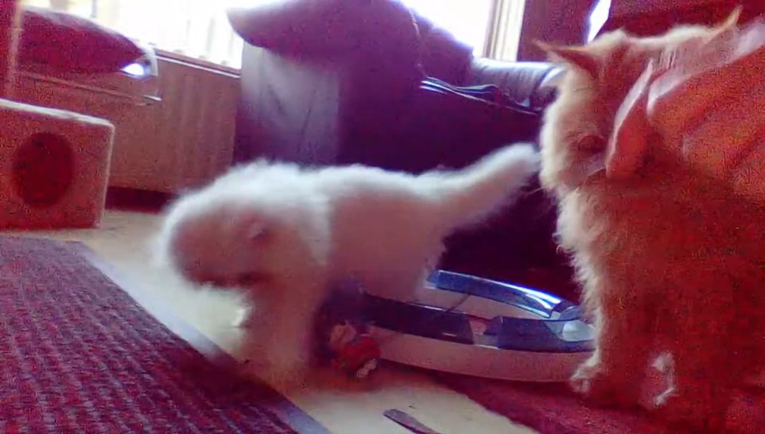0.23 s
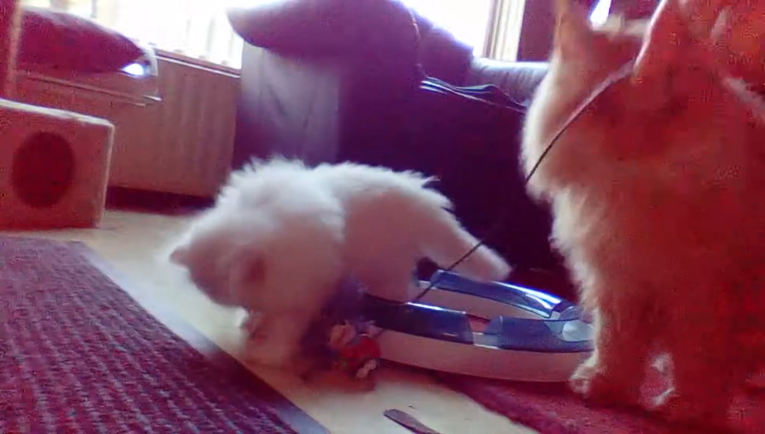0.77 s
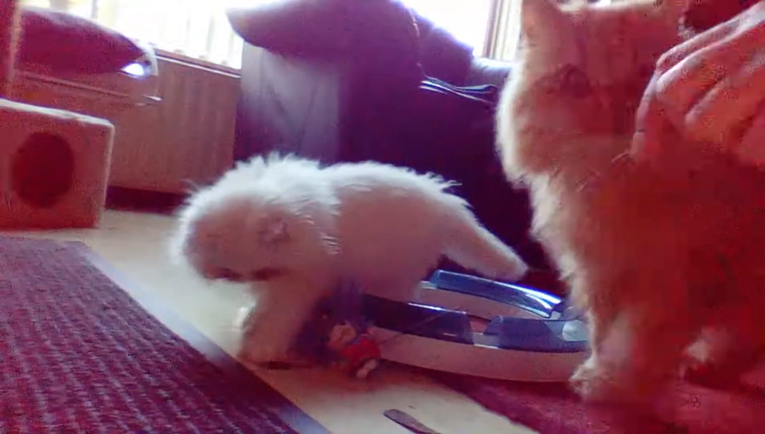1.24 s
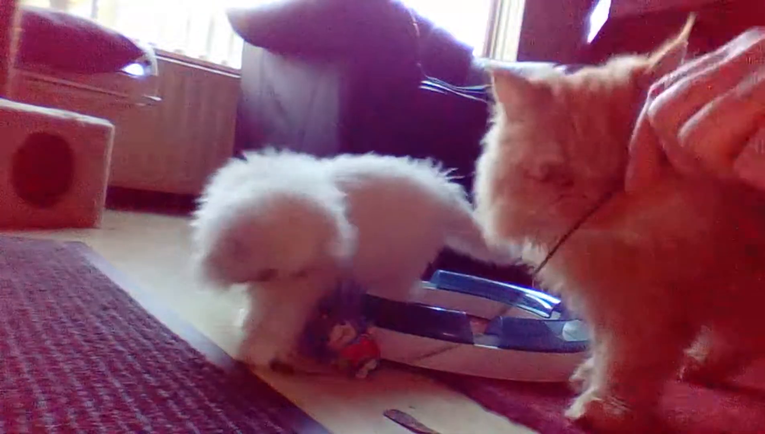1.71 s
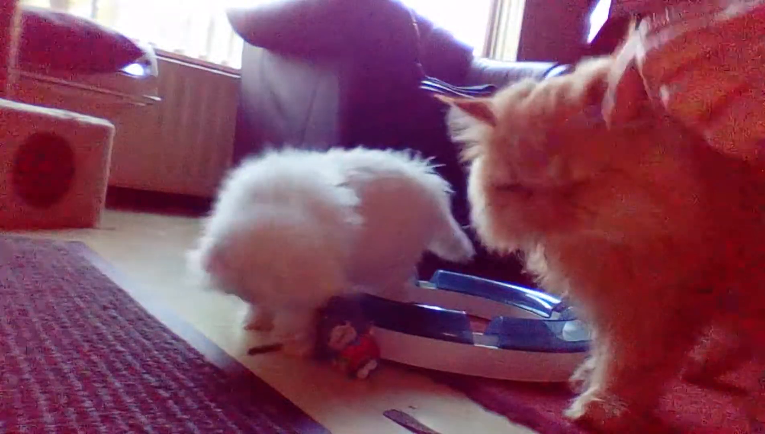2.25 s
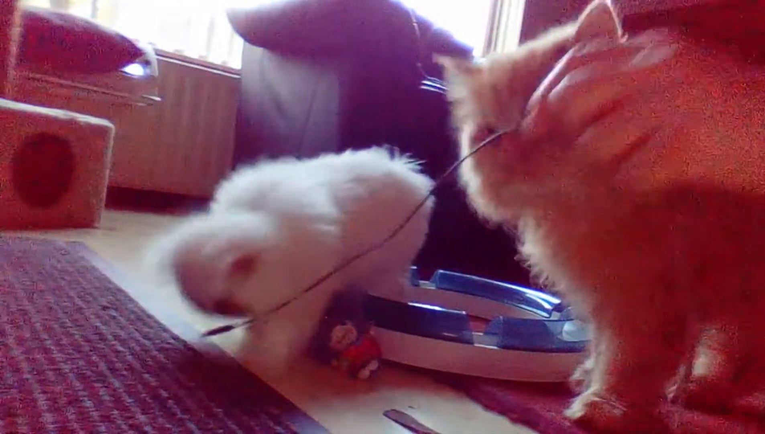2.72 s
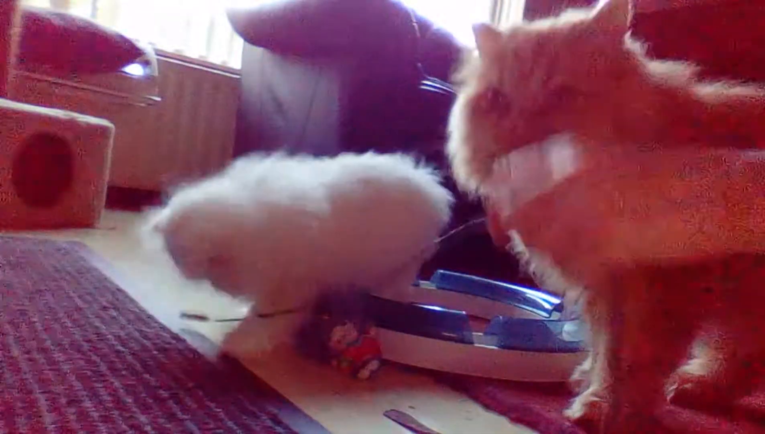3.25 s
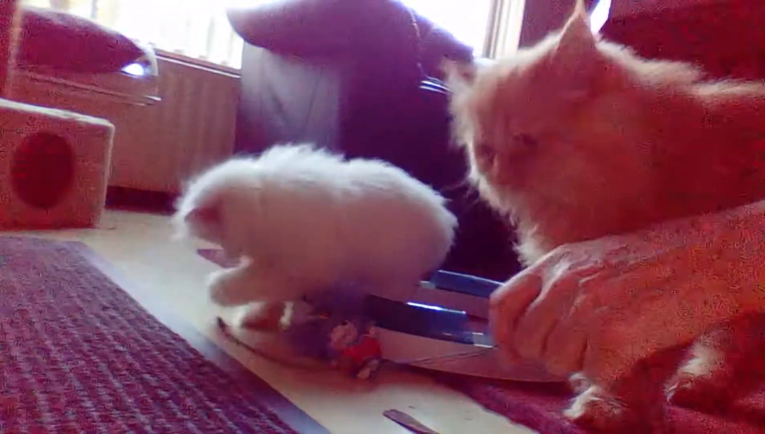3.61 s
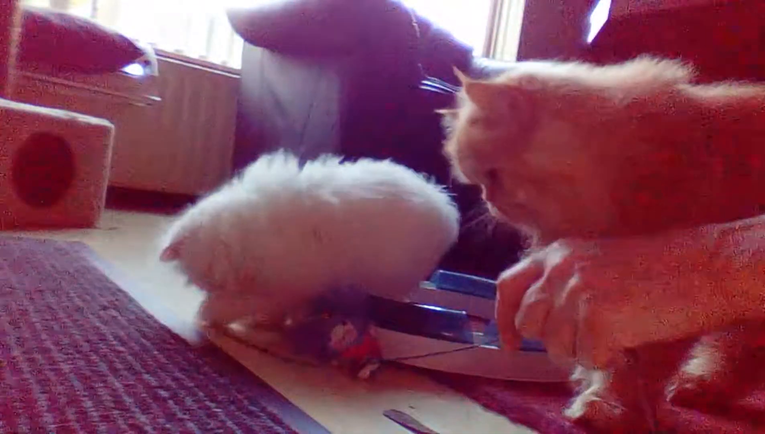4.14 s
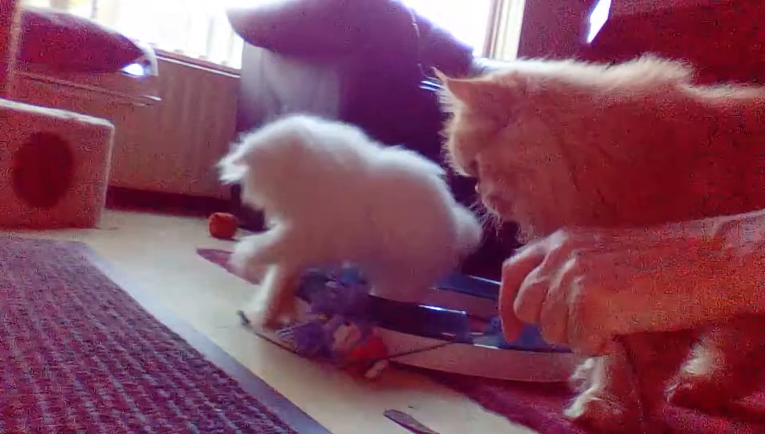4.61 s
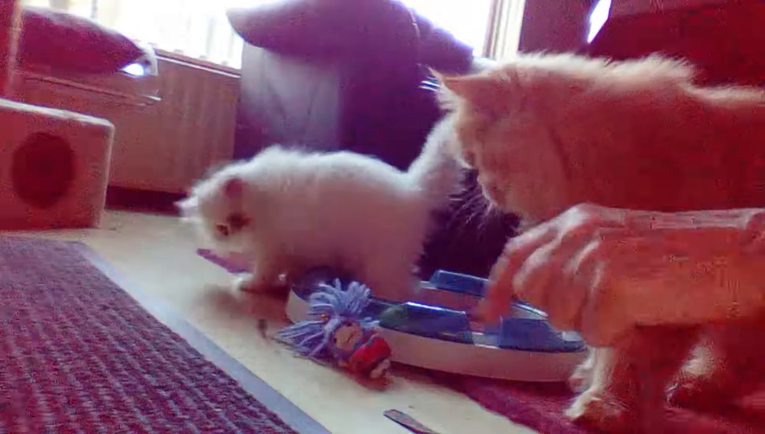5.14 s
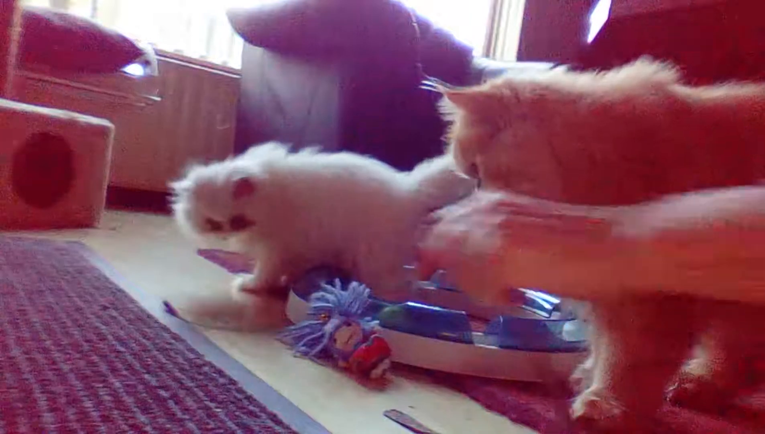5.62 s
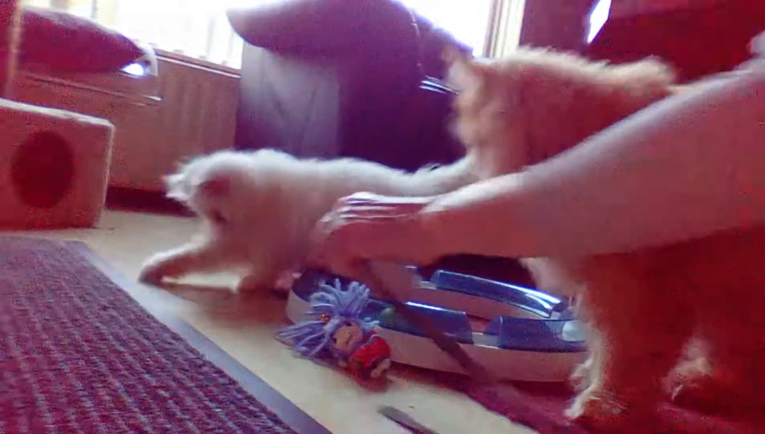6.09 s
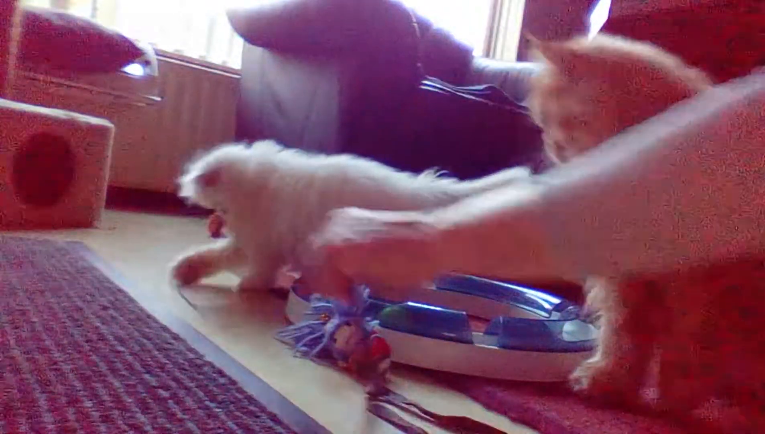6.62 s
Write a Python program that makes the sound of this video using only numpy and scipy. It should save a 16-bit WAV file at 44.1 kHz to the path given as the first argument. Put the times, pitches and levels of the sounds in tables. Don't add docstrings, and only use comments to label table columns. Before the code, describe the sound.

Hard plastic knocks and scrabbling scratches come in fits and starts as kittens play close by on the floor, a faint electrical hum beneath.

```python
import sys
import numpy as np
from scipy import signal
from scipy.io import wavfile
from scipy.ndimage import uniform_filter1d

SR = 44100
rng = np.random.default_rng(int(sys.argv[2]) if len(sys.argv) > 2 else 0)


def put_to_file(sound):
    columns = np.atleast_2d(sound).T
    safe = np.clip(columns, -1, 1)
    whole_steps = np.round(safe * 32767)
    wavfile.write(sys.argv[1], SR, whole_steps.astype(np.int16))


def level_to_linear(level):
    exponent = np.asarray(level, float) / 20
    return 10 ** exponent


N = 302526

# [t/s, peak level/dB, hollow body/dB, brightness/dB, chatter fall/dB per ms]
KNOCKS = [(0.0393, -2, -34, 23, 3.5), (0.0418, -10.5, -17.5, 13, 1), (0.048, -20, -35, -2, 5),
          (0.147, -31, -29, 5, -1), (0.208, -34.5, -21.5, -13, -1), (0.232, -18.5, -24, 4, -4),
          (0.237, -12, -26, 15, 0.5), (0.337, -34, -27, -0.5, -3), (0.995, -16, -27.5, 6.5, 0.5),
          (1.887, -3, -36, 18, 2), (1.8886, -14.5, -24, 30, -10.5), (1.906, -27, -15.5, 22, 11),
          (1.977, -30, -35, -25, 0), (2.063, -21, -20.5, 0, 2), (2.484, -16, -21, -31, 0.7),
          (2.519, -19.5, -17, -36, 3.5), (3.5423, -25, -32, 4, 2.5), (3.5503, 0.5, -39, 11.5, 2.5),
          (3.5527, -5.5, -40, 11.5, 2), (3.6237, -16, -28, 5, -1.3), (3.627, -10.5, -29.5, 1.5, 1),
          (3.677, -12.5, -26, 3.5, 0.6), (3.934, -35, -41.5, -6, 6), (5.367, -21, -36, -20, 1)]
# [t/s, peak level/dB, brightness/dB, left minus right/dB]
CLAW_CATCHES = [(0.6116, -37, 5, 0), (0.6408, -36.5, 5, 7), (0.6524, -43, 9, 3.0), (0.6647, -34.5, 3, 7),
                (0.688, -39, 3, 5), (0.7213, -43, 3, 7), (0.7303, -45, 8, 6), (0.7382, -45, 3, 14),
                (0.7552, -51, 5, 1.0), (0.7623, -36, 8, 9), (0.771, -39, 2, 8), (0.8021, -39, 1, 1),
                (0.8395, -50, 5, 3), (0.8844, -47, -3, 5), (0.9027, -42, 5, -3), (0.9302, -39, 5, 2.5),
                (0.9332, -32, 11, 6), (0.9388, -30, 7, 2), (0.9541, -33, 12, 7), (0.966, -36, 8, 10),
                (0.9765, -28.5, 11, 0),
                (1.07, -55, 10, 1.0), (1.0924, -44.5, 10, 2.5), (1.111, -43, 15, 1.5),
                 (1.15, -59, 8.8, 0.5), (1.208, -57, 10, 3.5), (1.2461, -57, 10, 2.2),
                 (1.2647, -56, 10, 1.2), (1.2912, -39, 8, 0.5), (1.3139, -39, 8.9, 0.5),
                 (1.3291, -32, 8.7, 6.6), (1.333, -28, 10, 6.7), (1.3464, -27.5, 11, 6),
                 (1.351, -34, 6.9, 2.5), (1.3642, -29, 8.2, 5.7), (1.4454, -32, 4.4, 4.0),
                 (1.472, -36, 6.5, 2.8), (1.51, -41, 8.7, 5.1), (1.5457, -32, 8, 3.0),
                 (1.5595, -33, 8.5, 2.5), (1.5776, -29.5, 7.5, 2.5), (1.5892, -29, 9.2, 3.0),
                 (1.6528, -30.5, 4.6, 6)]
# [t/s, peak level/dB, brightness/dB, left minus right/dB]
STRING_TICKS = [(2.196, -40, 7, 7), (2.205, -33.5, 15, 11), (2.214, -34.5, 2.5, 9), (3.979, -36, -4, 3),
                (4.088, -35.5, 1, 8), (4.138, -43, -3, -1), (4.359, -43.5, -5.5, 1), (4.518, -45, -16, 5.5),
                (4.836, -53, 3.5, 4), (4.858, -41, 3, 1.5), (4.889, -31, -2, 9), (4.904, -28, -3, 8),
                (4.948, -27, 1, -9), (4.968, -21.5, -1, 1), (5.136, -27.5, 4, -10), (5.155, -32, -3, -1),
                (5.188, -31, -14, -2), (5.236, -39, 2, 5), (5.256, -37, -6, 5), (5.301, -36, 4, -9),
                (5.331, -36, 12, -5), (5.341, -31, 2, 3), (6.117, -40, 6, -6), (6.608, -43, 3, -2),
                (6.711, -35, -6, -11), (6.832, -30, -3, -6)]
# [touch t/s, hardest t/s, lift t/s, level/dB, brightness/dB]
STROKES = [(-.02, 0.0, 0.01, -46, 6), (0.388, .425, 0.41, -60.5, -11), (0.607, 0.652, 0.66, -49.5, -2.5),
           (0.73, 0.758, 0.75, -50, -4), (0.804, 0.856, 0.9, -59, -30), (0.893, 0.976, 0.97, -46, -8.5),
           (1.054, 1.098, 1.127, -53.5, -27), (1.238, 1.31, 1.6, -56.5, -7), (1.321, 1.375, 1.43, -46, 1.5),
           (1.439, 1.455, 1.456, -47, -20), (1.507, 1.505, 1.6, -56.5, -22),
           (1.549, 1.57, 1.622, -45.5, -3), (2.191, 2.21, 2.22, -51.5, -16),
           (3.93, 3.936, 3.91, -48, -10.5), (3.976, 3.992, 4.024, -51, -20), (4.083, 4.082, 4.14, -60, -12),
           (4.842, 4.91, 4.93, -49, -13), (4.937, 4.98, 4.975, -43.5, 0), (5.136, 5.142, 5.21, -51.5, -5),
           (5.221, 5.248, 5.26, -56.5, -3), (5.322, 5.348, 5.37, -51.5, -13),
           (6.604, 6.612, 6.67, -57.5, -5), (6.665, 6.72, 6.755, -51.5, -7),
           (6.772, 6.855, 6.82, -49.5, -6.5)]
# [t/s, level/dB, brightness/dB, hollow body/dB]
TAILS = [(0.052, -38.5, 25, -14), (0.148, -59, -7, -25), (0.245, -47, -2, -9.5), (0.339, -60, -11, -9),
         (1.001, -51, -17, -20), (1.899, -42.5, 1, -18), (1.986, -60.5, -17, 4), (2.03, -62.5, -14, 5.5),
         (2.07, -51, -14, -27), (2.491, -53, -15, 2), (2.527, -60, -24, 2), (3.543, -44, -1, -22),
         (3.563, -34, 13, -20), (3.638, -40.5, 9, -18), (3.691, -44, 5.5, -15)]
# [f/Hz, level/dB, time to fall 60 dB/s]
RIM = [(2450, -4, 0.018), (3150, -13.5, 0.045), (4227, 10, 0.036), (5400, -41, 0.0032), (5600, 4, 0.03)]
# [f/Hz, level/dB, time to fall 60 dB/s]
WALL = [(990, -24.5, 0.039), (1102, 6, 0.018), (1255, 1, 0.017), (1680, -12.5, 0.093)]
# [f/Hz, level/dB, time to fall 60 dB/s]
SHELL = [(310, 8, 0.0095), (406, 0, 0.046), (455, -3.5, 0.047), (518, -3, 0.045), (640, -8, 0.02)]
# [t/s, level/dB]
ROLL_NUDGES = [
    (2.937, -66.5),
    (3.061, -77),
    (3.089, -75),
    (3.154, -68),
    (3.25, -70),
]
# [middle t/s, length/s, level/dB, centre f/Hz]
FUR_BRUSHES = [
    (3.325, 0.077, -64, 6000),
    (5.601, .14, -60, 6700),
    (6.176, .1, -63, 6000),
    (6.312, 0.076, -66, 6400),
    (6.31, 0.13, -74.5, 1900),
]
# [t/s, peak level/dB, f/Hz, time to
# fall 60 dB/s]
THUMPS = [(0.052, -45, 87, 0.15), (0.088, -49, 80.7, 0.12), (0.299, -68, 95, 0.12),
          (2.491, -39, 400, 0.082), (2.497, -58.5, 93.6, 0.12), (2.519, -60, 92.97, 0.12),
          (3.555, -52, 69.5, 0.15), (3.629, -46, 96, 0.076), (3.688, -49, 83.4, 0.11),
          (4.918, -50, 97, 0.16), (6.219, -50, 90, 0.093)]
# [f/Hz, time to fall 60 dB/s]
ROOM_RING = [(300, 0.32), (800, 0.39), (2100, 0.14), (5500, 0.093)]
# [f/Hz, level/dB]
LEFT_PORT = [(200, -31.5), (800, -14.5), (2000, -11.5), (3900, -3.5), (5200, -3), (6000, -4.5),
             (6650, -3.5), (7200, -6), (7600, -9.5), (8100, -22), (10000, -60.5), (11500, -56),
             (16000, -101.5)]
# [f/Hz, level/dB]
RIGHT_PORT = [(200, -37), (800, -14.5), (2000, -14), (3900, -3), (4700, 0), (5800, -10), (7000, -17),
              (7900, -17.5), (9300, -19.5), (10300, -28), (11500, -50), (16000, -75)]
# [from t/s, delay/samples]
LEFT_LATE = [
    (0, 2),
    (2.4, 5),
    (3.4, 6),
    (3.9, 4),
]
# [f/Hz, level/dB per Hz]
HISS_COLOUR = [(20, -20), (45, -24), (70, -15.5), (120, 5), (200, -5), (300, -9.5), (600, -14.5),
               (1500, -21), (4000, -23), (6600, -22), (7600, -31), (8300, -37.5), (11000, -39.5),
               (15000, -41.5)]
# [f/Hz, likeness/0 to 1]
HISS_LIKENESS = [(60, 0.6), (240, 0.33), (470, 0.064), (940, 0.028)]
# [f/Hz, left minus right/dB]
HISS_BALANCE = [(60, -0.5), (160, 2.5), (410, -1.5), (1080, 0), (2830, 0.5), (7430, 3)]
# [multiple of mains f, left level/dB, right level/dB, phase/rad]
HUM_PARTS = [(1, -83, -83, -5), (2, -67, -65, -2.5), (3, -59, -56, 2), (4, -75.5, -83.5, -0.3),
             (6, -91.5, -89.5, -1.5)]


def taps():
    knock_pan_db = 1.5
    claw_gain_db, claw_body_db, claw_chatter_db, claw_pan_db = 8.5, -27.5, 5.5, 0.5
    tick_body_db, tick_chatter_db = -30, 1.5
    rows = [(*row, knock_pan_db) for row in KNOCKS]
    for s, db, bright_db, pan_db in CLAW_CATCHES:
        rows.append((s, db + claw_gain_db, claw_body_db, bright_db, claw_chatter_db, pan_db + claw_pan_db))
    for s, db, bright_db, pan_db in STRING_TICKS:
        rows.append((s, db, tick_body_db, bright_db, tick_chatter_db, pan_db))

    clicks = np.zeros((2, 3, N + 4096))
    chance = rng.random((len(rows), 2, 9))
    for (s, db, body_db, bright_db, chatter_db, pan_db), (gaps, sizes) in zip(rows, chance):
        after_ms = np.cumsum(np.r_[0, 0.35 + 1.1 * gaps[1:]])
        fall_db = np.clip(chatter_db, 0.5, 8) * after_ms
        size = level_to_linear(15 - fall_db) * np.r_[1, 1.7 * (sizes[1:] - 0.5)]
        at = np.round((s + (after_ms + 0.7) / 1000) * SR).astype(int)
        sides = level_to_linear(np.clip([pan_db, -pan_db], -8, 8) / 2)
        mix = np.outer(sides, hardness(db, bright_db, body_db + 5))
        clicks[:, :, at] += mix[:, :, None] * size
    sound = np.array([plastic(*side[:, :N]) for side in clicks])
    return level_to_linear(-1.5) * fizzed(sound, -4)


def strokes():
    slips_per_s, snaps_per_s = 7000, 320
    spread_db, clump_db, fibre_db, snap_db = 1.5, 2.5, 5, 17
    scrape, tail = pressure()
    clumps = slow_wander(rng.standard_normal(N), 200)
    size = level_to_linear(spread_db * np.minimum(rng.exponential(1, N), 4) + clump_db * clumps)
    slips = evened(size * rng.choice([-1, 1], N) * (rng.random(N) < slips_per_s / SR))

    fibre = rng.integers(0, 16, N)
    grains = np.zeros((2, N))
    t = np.arange(128) / SR
    for k, hz in enumerate(np.geomspace(1300, 9000, 16)):
        twang = np.cos(2 * np.pi * hz * t) * level_to_linear(-3.5 * hz * t)
        pluck = (t == 0) + level_to_linear(fibre_db) * twang / np.linalg.norm(twang)
        grain = signal.oaconvolve(slips * (fibre == k), pluck)[:N]
        grains += [grain, np.roll(grain, rng.integers(-4, 5))]

    snaps = level_to_linear(snap_db + 3.5 * rng.standard_normal(N)) * (rng.random(N) < snaps_per_s / SR)
    washes = 1.2 * rng.standard_normal(N) + 1.3 * rng.standard_normal((N, 2)).T
    rubbed = [plastic(*(scrape * (grain + snaps) + tail * wash)) for grain, wash in zip(grains, washes)]
    return level_to_linear(4) * fizzed(np.array(rubbed), -0.5)


def pressure():
    touch_db, lift_db, body_db = -9.5, -4.5, -15.5
    land_db_per_s, release_db_per_s, tail_fall_db_per_s = 2500, 267, 253.5
    t = np.arange(0, N + 32, 32) / SR
    scrape, tail = 0, 0
    for touch, hardest, lift, db, bright_db in STROKES:
        times = [touch, max(hardest, touch), max(lift, hardest)]
        shape_db = np.interp(t, times, [touch_db, 0, lift_db])
        shape_db -= release_db_per_s * np.maximum(t - lift, 0)
        shape_db -= land_db_per_s * np.maximum(touch - t, 0)
        stroke_body_db = body_db + (db + 51)
        scrape = scrape + hardness(db + shape_db, bright_db, stroke_body_db) ** 2
    for s, db, bright_db, tail_body_db in TAILS:
        level_db = np.where(t < s, -160, db - tail_fall_db_per_s * (t - s))
        tail = tail + hardness(level_db, bright_db, tail_body_db) ** 2
    return np.repeat(np.sqrt([scrape, tail]), 32, axis=2)[:, :, :N]


def hardness(db, bright_db, body_db):
    bright_db = np.clip(bright_db, -25, 18)
    sharp_db = db + np.minimum(bright_db, 0)
    dull_db = db - np.maximum(bright_db, 0)
    return level_to_linear(np.array([sharp_db, dull_db, db + body_db]))


def plastic(sharp, dull, hollow):
    thin = signal.lfilter(*signal.butter(1, 1970, "high", fs=SR), sharp)
    soft = signal.lfilter(*signal.butter(1, 2320, fs=SR), dull)
    rim, wall, shell = level_to_linear(-24) * ring(sharp, RIM), level_to_linear(-14) * ring(dull, WALL), level_to_linear(12) * ring(hollow, SHELL)
    return thin + 1.8 * soft + rim + wall + shell


def ring(clicks, modes):
    t = np.arange(4096) / SR
    shape = sum(level_to_linear(db - 60 * t / t60) * np.sin(2 * np.pi * hz * t) for hz, db, t60 in modes)
    return signal.oaconvolve(clicks, shape / np.linalg.norm(shape))[:N]


def fizzed(x, db):
    return x + level_to_linear(db) * signal.lfilter(*signal.butter(2, [5400, 7600], "band", fs=SR), x)


def roll():
    rise_db_per_s, fall_db_per_s, bumps_per_s = 403, 290, 900
    t = np.arange(N) / SR
    bumps = rng.standard_normal((2, N)) * (rng.random(N) < bumps_per_s / SR)
    level = 0
    for s, db in ROLL_NUDGES:
        level = level + level_to_linear(db + np.minimum(rise_db_per_s * (t - s), fall_db_per_s * (s - t)))
    return level * np.array([evened(ring(side + 0.62 * bumps[0], SHELL)) for side in bumps])


def brushes():
    half_width = 0.12
    out = np.zeros((2, N))
    for s, length, db, hz in FUR_BRUSHES:
        t = np.arange(int(2 * length * SR)) / SR
        band = signal.butter(2, [hz * (1 - half_width), hz * (1 + half_width)], "band", fs=SR)
        air = signal.lfilter(*band, rng.standard_normal((16384, 2)).T)[:, :len(t)]
        swell = np.sin(np.pi * t / (2 * length)) ** 2
        at = int((s - length) * SR)
        out[:, at:at + len(t)] += level_to_linear(db) * swell * evened(air)
    return signal.lfilter(*signal.butter(6, 7500, fs=SR), out)


def thumps():
    out, t = np.zeros(N), np.arange(N) / SR
    for s, db, hz, t60 in THUMPS:
        u = np.maximum(t - s + 0.0062, 0)
        onset = 1 - np.exp(-u / 0.0021)
        out += level_to_linear(db - 60 * u / t60) * np.sin(2 * np.pi * hz * u) * onset
    return out


def room(x):
    near_db, far_db, turn_s = -11, -13, 1.274
    out = x.copy()
    turn = 2 * np.pi * np.arange(N) / SR / turn_s
    for k in range(3):
        share = np.sqrt(2 / 3) * np.cos(turn + k * np.pi / 3)
        t = np.arange(400) / SR
        near = rng.standard_normal((2, 400)) * (rng.random((2, 400)) < 0.05)
        near *= level_to_linear(-900 * t) * (t > 0.0004)
        hz, t, z = signal.stft(rng.standard_normal((2, SR // 2)), SR, nperseg=256)
        fall = level_to_linear(-60 * t / read(ROOM_RING, hz)[:, None])
        far = signal.istft(z * fall, SR, nperseg=256)[1]
        far[:, :350] = 0
        echo = level_to_linear(far_db) * far / np.linalg.norm(far[0])
        echo[:, :400] += level_to_linear(near_db) * near / np.linalg.norm(near, axis=1, keepdims=True)
        out += signal.oaconvolve(x * share, echo, axes=1)[:, :N]
    return out


def port(colour):
    hz = abs(np.fft.fftfreq(4096, 1 / SR))
    log_gain = np.log(level_to_linear(read(colour, hz)))
    return np.fft.ifft(np.exp(np.conj(signal.hilbert(log_gain)))).real[:2048]


def hum():
    mains_hz, waver = 50.006, 1.25
    t, out = np.arange(N) / SR, np.zeros((2, N))
    for multiple, left_db, right_db, phase in HUM_PARTS:
        waver_db = waver * slow_wander(rng.standard_normal((2, N)), 4000)
        level = np.sqrt(2) * level_to_linear(np.array([[left_db], [right_db]]) + waver_db)
        out += level * np.cos(2 * np.pi * multiple * mains_hz * t + phase)
    return out


def hiss():
    level_db, patch_db = -64, 1.95
    frames, hz = N // 256 + 5, np.fft.rfftfreq(1024, 1 / SR)
    a, b, c, d, patches = rng.standard_normal((frames, 513, 5)).T
    patches = evened(uniform_filter1d(uniform_filter1d(patches, 14, 0), 16, 1))
    same = np.clip(read(HISS_LIKENESS, hz), -1, 1)[:, None]
    left = a + 1j * b
    right = same * left + np.sqrt(1 - same ** 2) * (c + 1j * d)
    balance_db = np.outer([0.5, -0.5], read(HISS_BALANCE, hz))[:, :, None]
    z = np.array([left, right]) * level_to_linear(read(HISS_COLOUR, hz)[:, None] + patch_db * patches + balance_db)
    return level_to_linear(level_db) * evened(signal.istft(z, nperseg=1024, noverlap=768)[1][:, :N])


def slow_wander(noise, length):
    return evened(uniform_filter1d(uniform_filter1d(noise, length), length))


def evened(x):
    return x / np.sqrt(np.mean(x ** 2) + 1e-20)


def read(points, hz):
    f, value = np.transpose(points)
    return np.interp(np.log(hz + 1), np.log(f + 1), value)


def scene():
    ports = np.array([port(LEFT_PORT), port(RIGHT_PORT)])
    toy = room(taps() + strokes())
    early, right = signal.oaconvolve(toy, ports, axes=1)[:, :N]
    left = early.copy()
    for s, late in LEFT_LATE:
        start = int(s * SR)
        left[start:] = np.roll(early, late)[start:]
    return np.array([left, right]) + brushes() + roll() + thumps() + hum() + hiss()


def top_cut(x):
    return signal.sosfilt(signal.butter(12, 15200, fs=SR, output="sos"), x)


def record(dry):
    rounded = 2.6 * np.tanh(dry / 2.6)
    return top_cut(rounded)


dry = scene()
out = record(dry)
put_to_file(out)
```